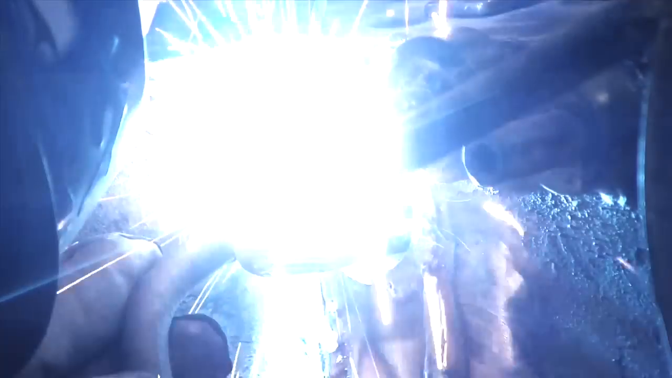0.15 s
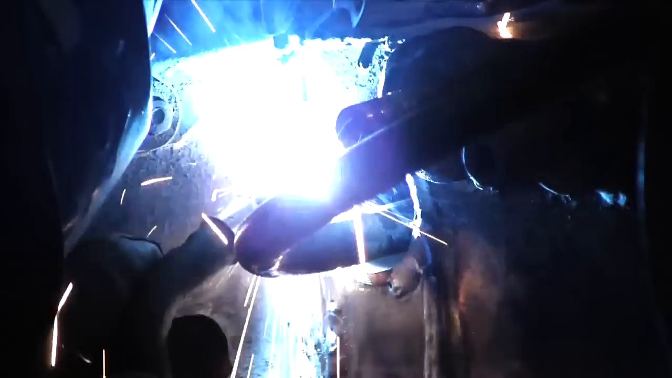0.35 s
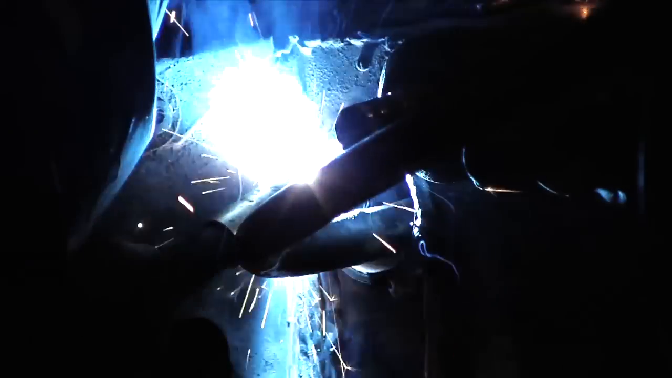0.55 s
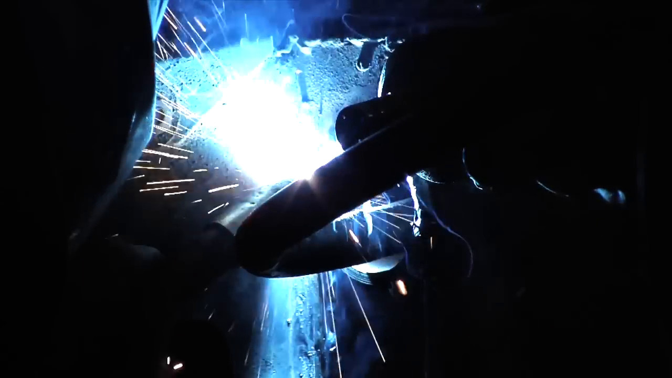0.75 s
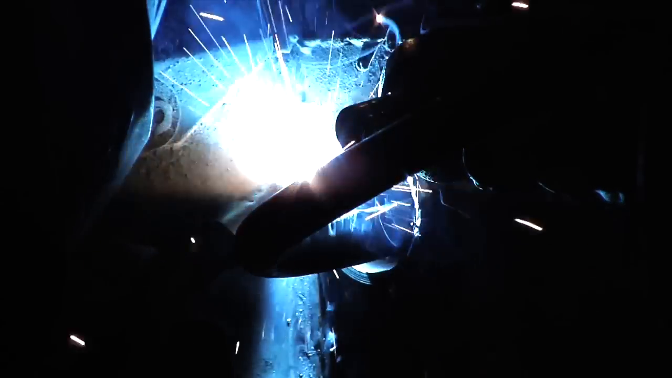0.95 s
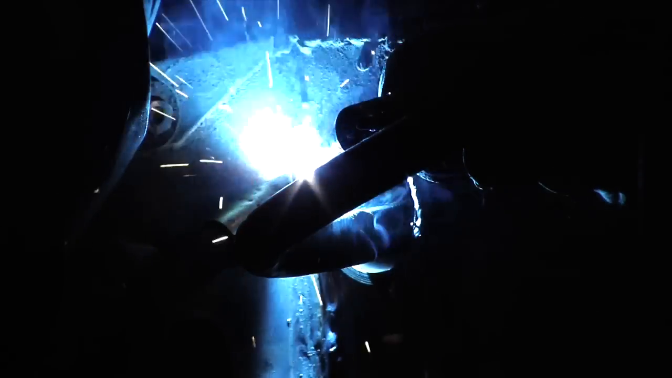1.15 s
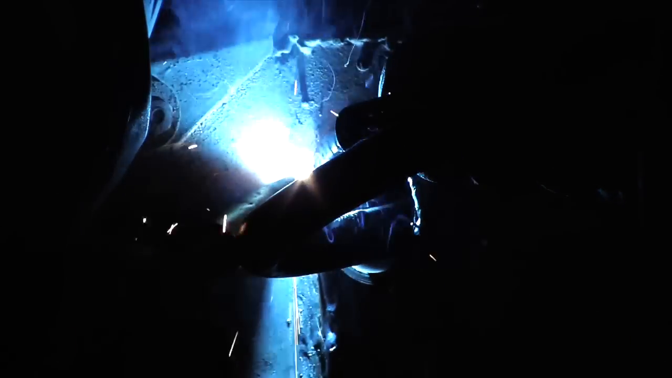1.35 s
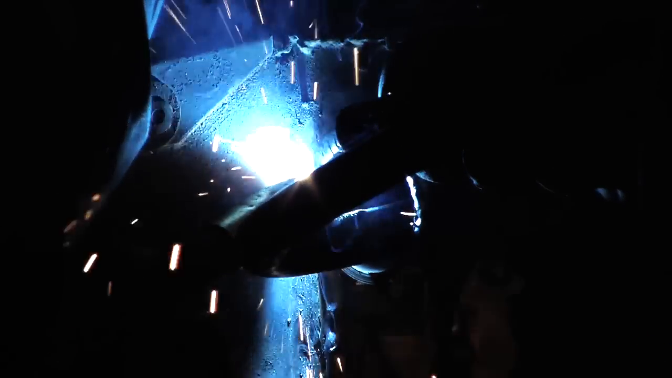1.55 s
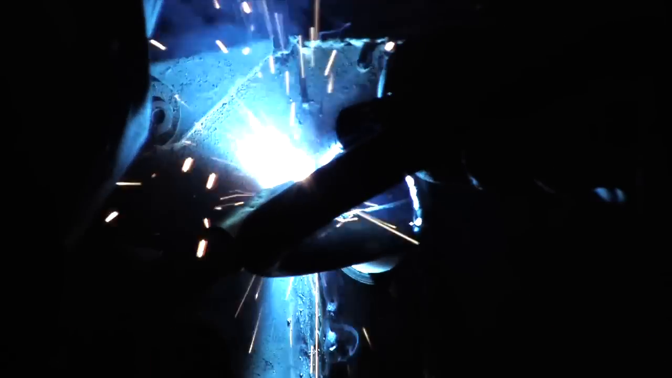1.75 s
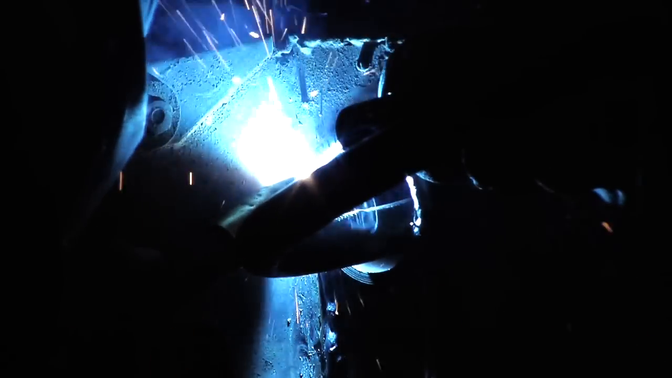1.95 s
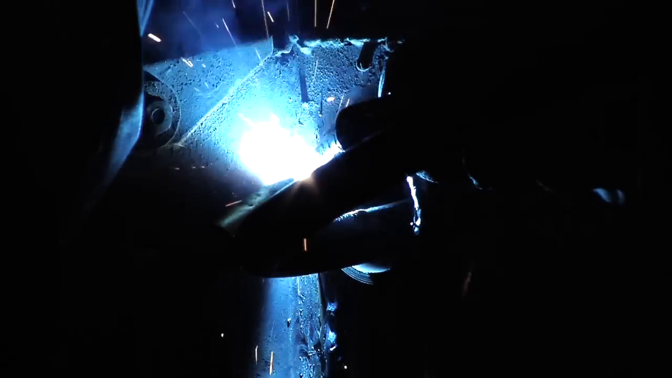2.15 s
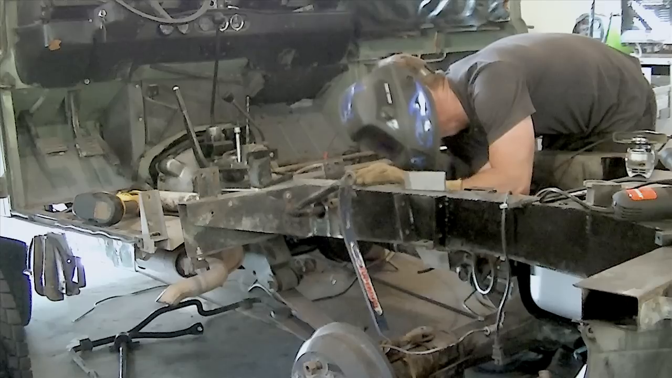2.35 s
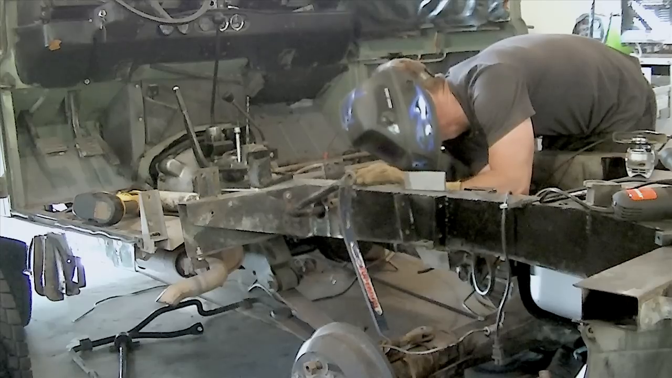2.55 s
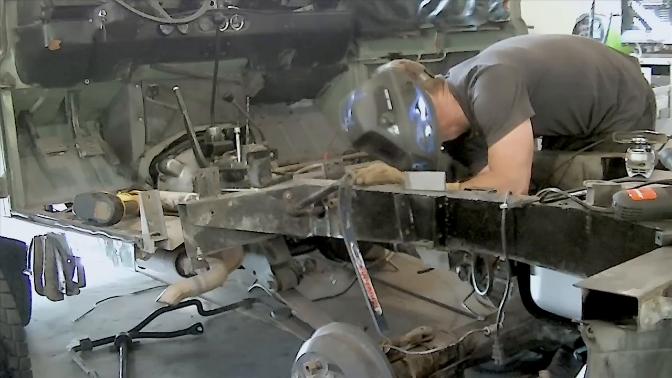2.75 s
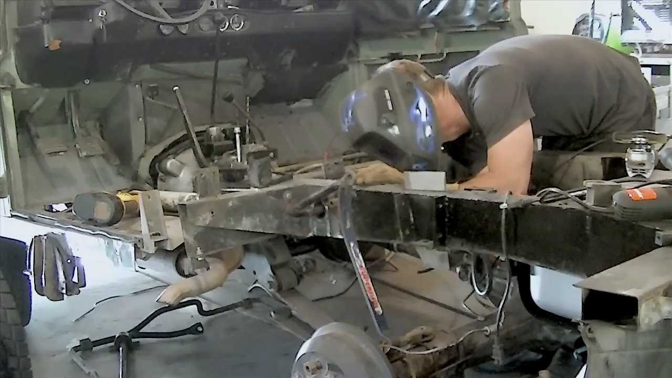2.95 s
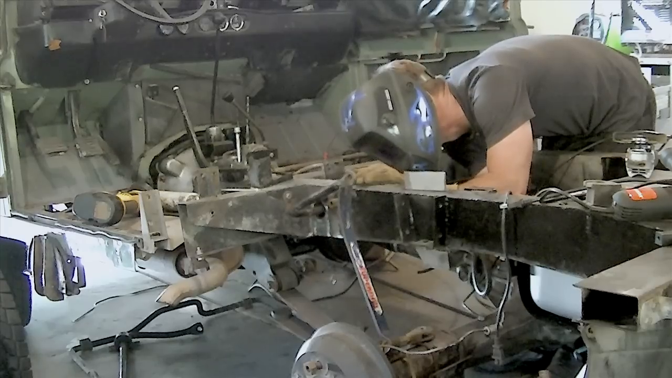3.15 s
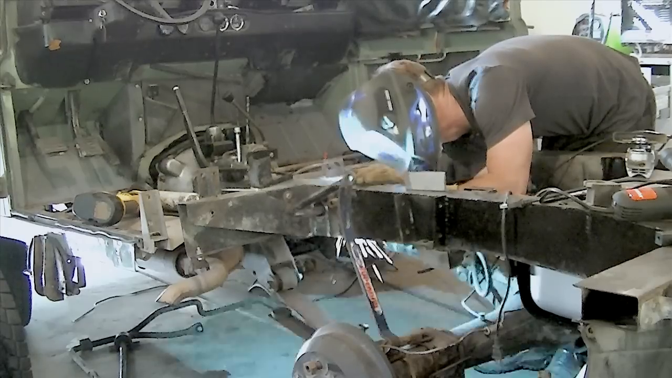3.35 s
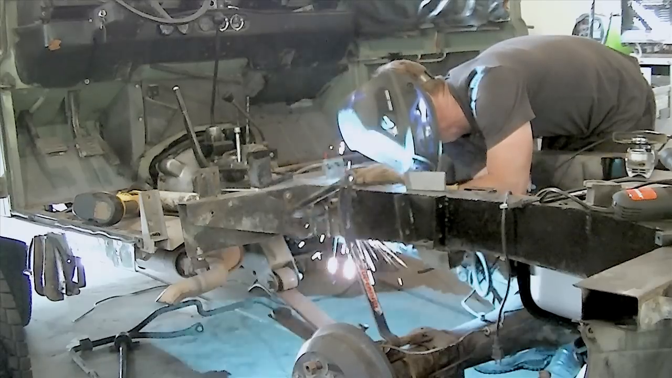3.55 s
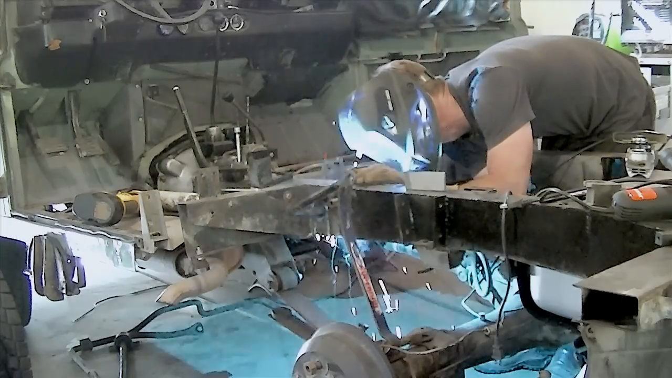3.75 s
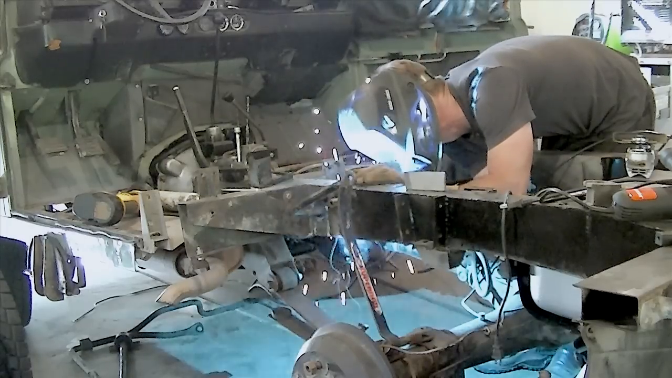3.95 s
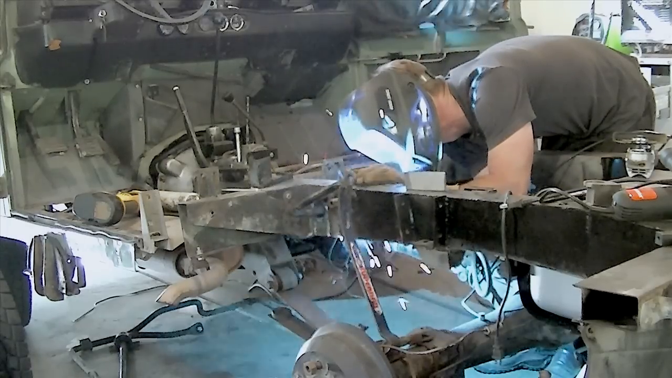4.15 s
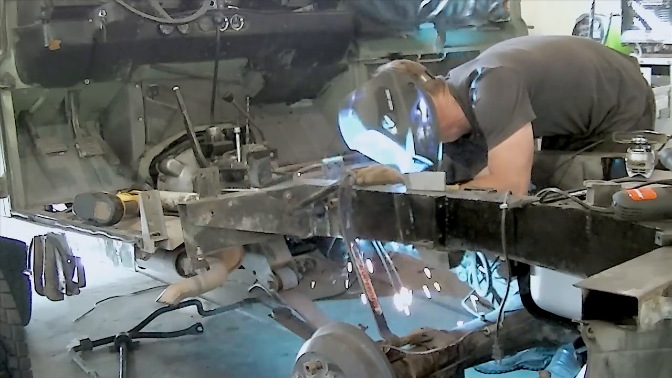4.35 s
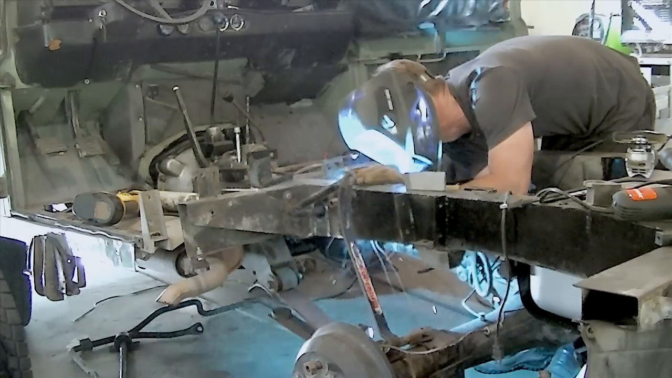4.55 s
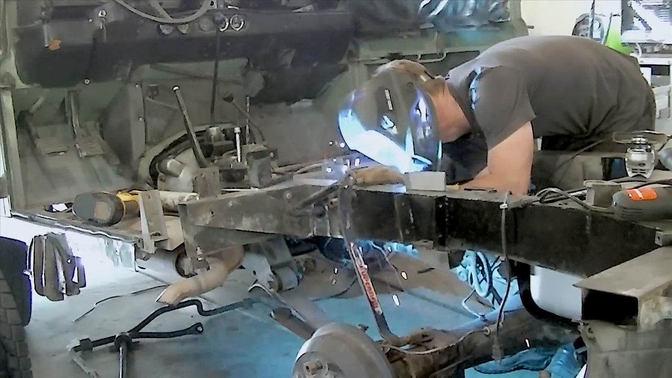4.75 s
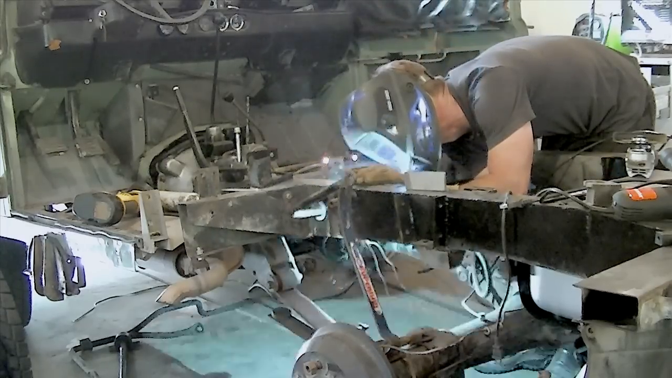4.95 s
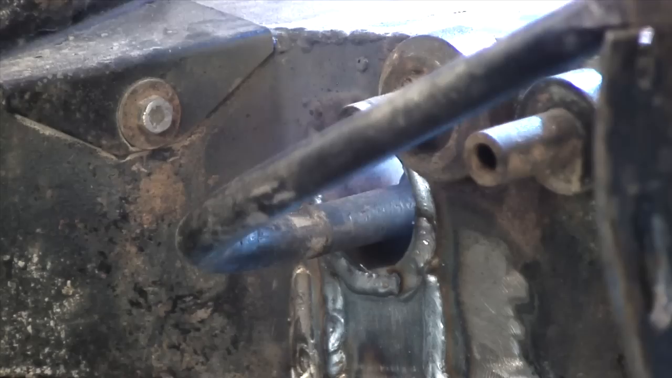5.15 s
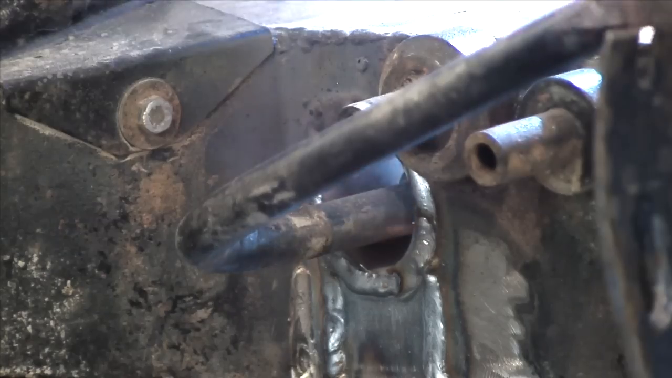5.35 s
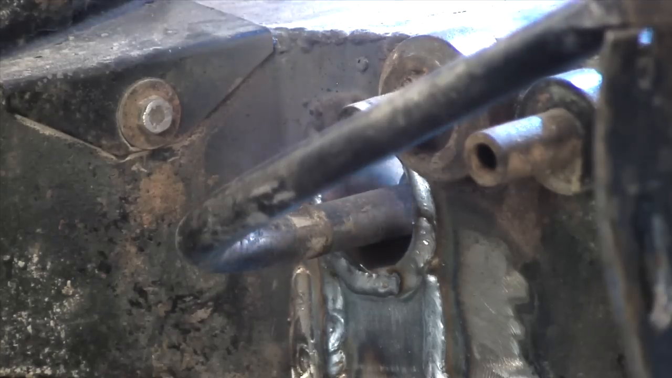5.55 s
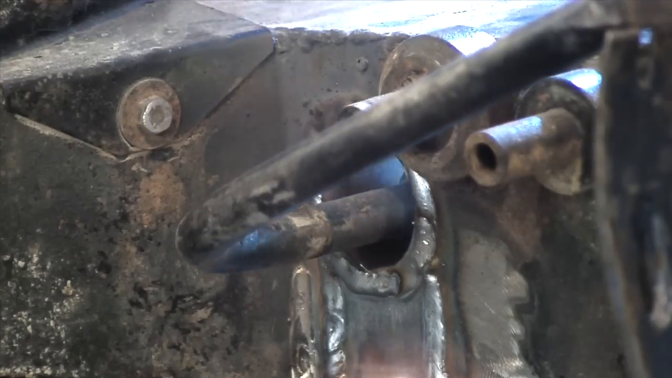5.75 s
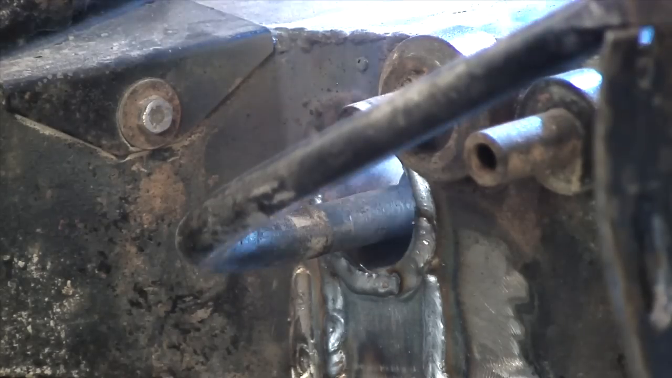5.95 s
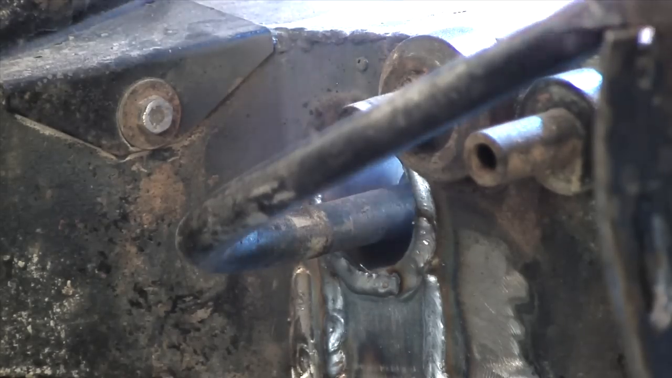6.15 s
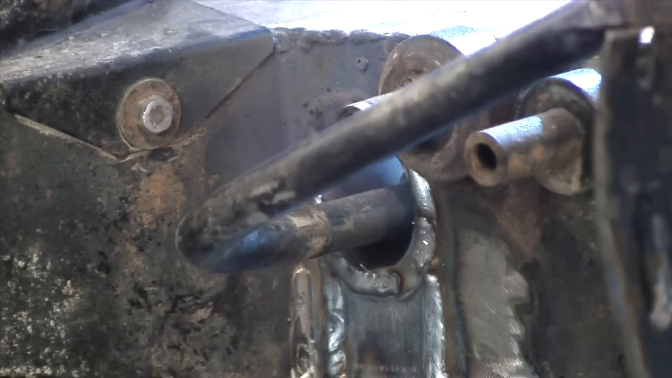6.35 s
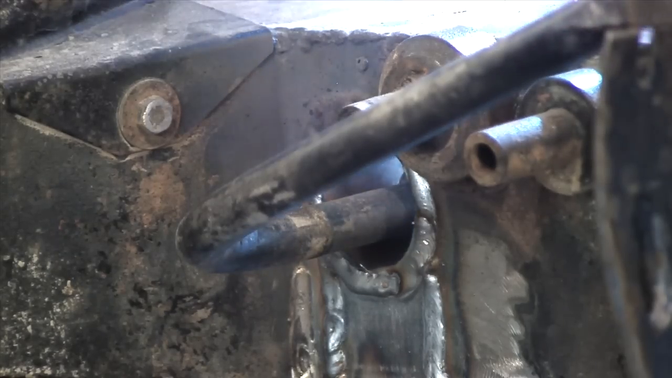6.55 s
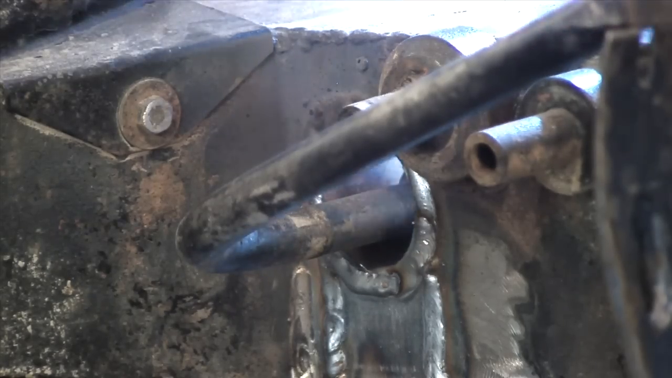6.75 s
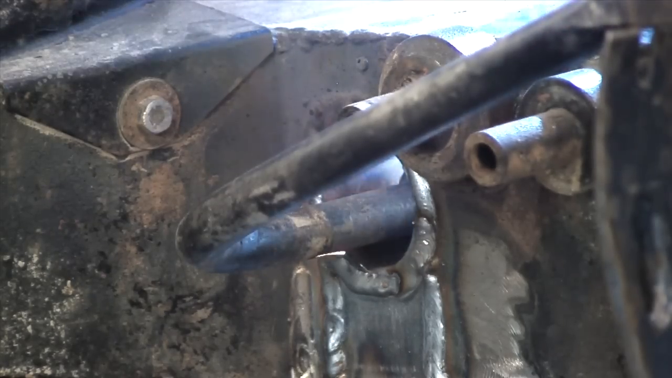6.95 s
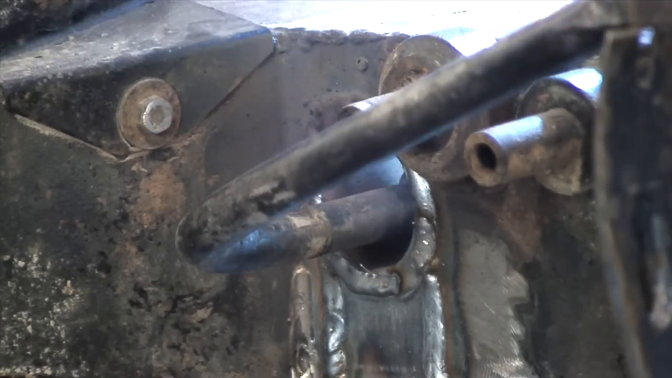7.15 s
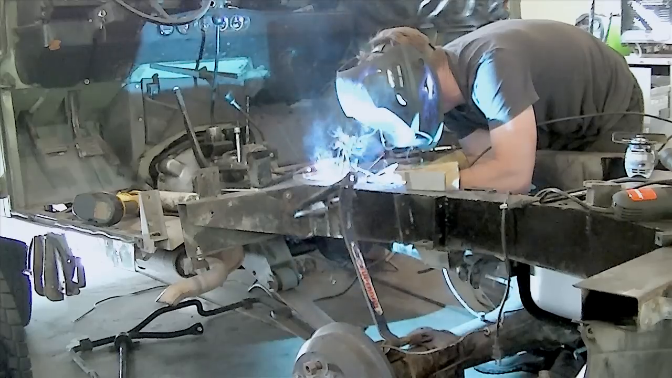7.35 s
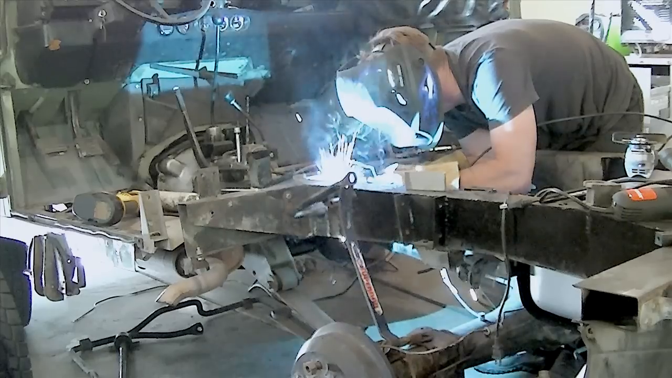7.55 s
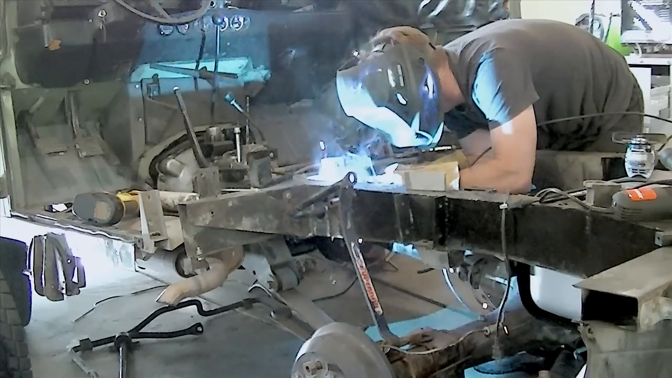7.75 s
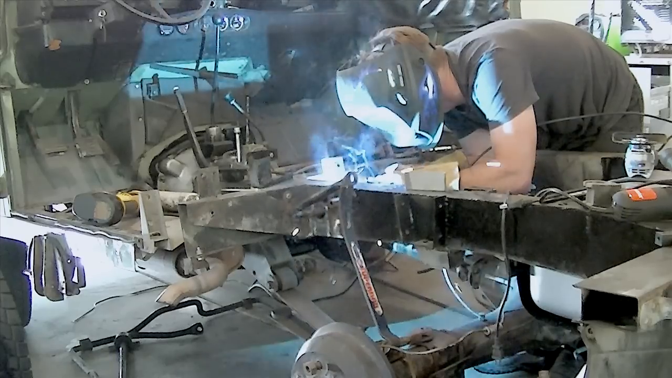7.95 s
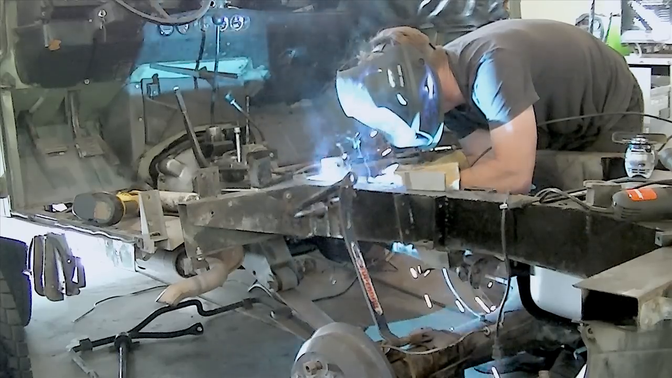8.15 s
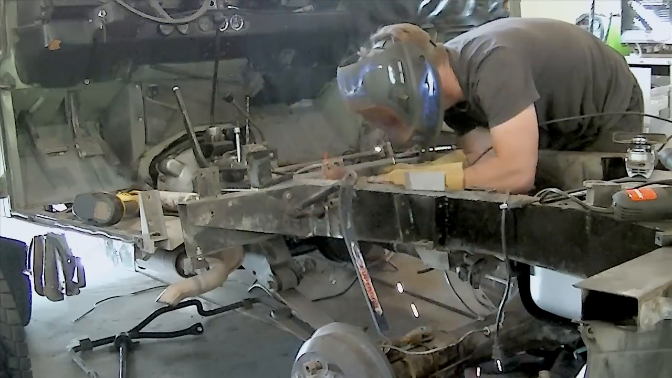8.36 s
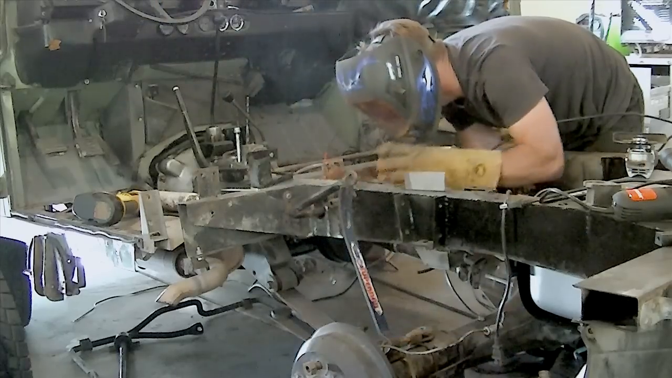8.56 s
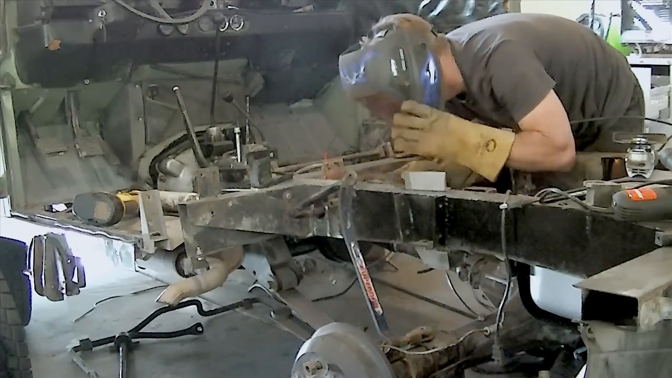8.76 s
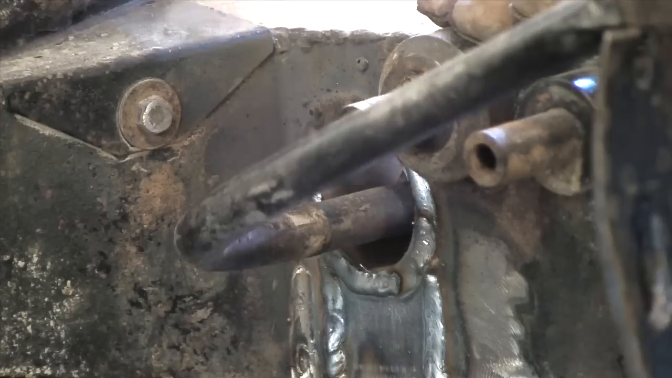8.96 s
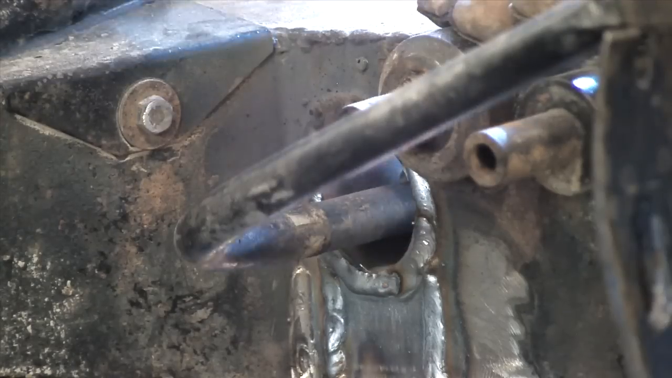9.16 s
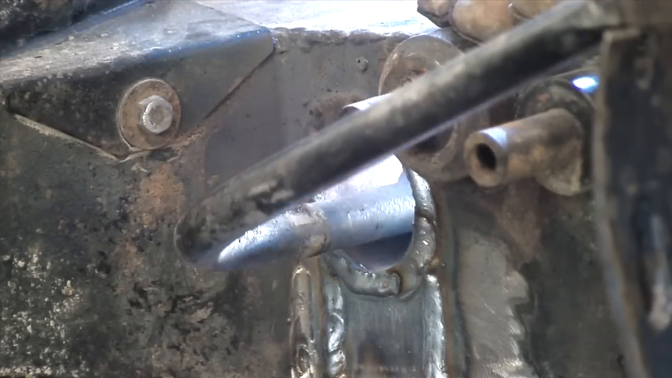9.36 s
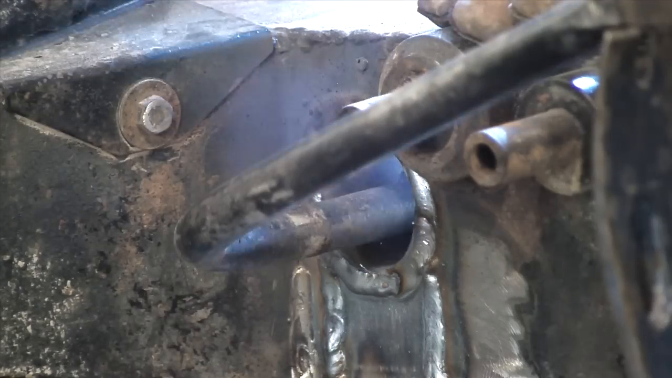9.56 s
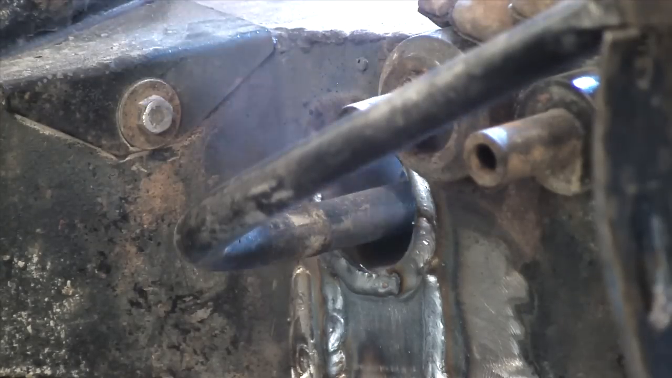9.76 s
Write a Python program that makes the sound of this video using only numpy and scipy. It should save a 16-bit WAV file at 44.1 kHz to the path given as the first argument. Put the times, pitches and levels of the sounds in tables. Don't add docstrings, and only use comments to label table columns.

```python
import sys
import numpy as np
from scipy import signal
from scipy.fft import rfft, irfft, next_fast_len
from scipy.io import wavfile
from scipy.ndimage import uniform_filter1d

SR = 44100
rng = np.random.default_rng(int(sys.argv[2]) if len(sys.argv) > 2 else 0)


def invert_db(x):
    u = np.asarray(x, float) / 20
    return 10 ** u


def master_out(mix):
    frames = np.transpose(np.atleast_2d(mix))
    ceiling = np.clip(frames, -1, 1)
    pcm = np.round(ceiling * 32767).astype(np.int16)
    wavfile.write(sys.argv[1], SR, pcm)


N = 432621
TOP_HZ = 15230


def on_log_axis(table, hz):
    table_hz, value = np.transpose(table)
    return np.interp(np.log(hz + 1), np.log(table_hz), value)


def shaped(x, gain):
    size = next_fast_len(len(x))
    spectrum = rfft(x, size) * gain(np.fft.rfftfreq(size, 1 / SR))
    return irfft(spectrum, size)[:len(x)]


def level(x, db):
    return x * invert_db(db) / np.sqrt(np.mean(x ** 2))


# (time [s], energy [dB])
BURSTS_1 = [(.1113, 5.5), (.1263, 9.5), (.1492, -14), (.1763, 5), (.1815, 5), (.1886, 9), (.2028, 7.5),
            (.222, 5.5), (.2401, 7), (.2466, 2), (.2698, 9), (.2905, 5), (.2982, 7), (.3049, 9),
            (.3212, 12), (.346, 11.5), (.3534, 7), (.3695, 7.5), (.3866, 5), (.395, 7), (.4232, 8.5),
            (.4385, 7), (.4696, -6), (.4944, 10), (.5213, 11), (.5435, 4), (.5502, 9), (.5645, -0.5),
            (.5809, 6), (.599, 7), (.635, 2.5), (.678, -2), (.6985, 1.5), (.7201, 0), (.7384, -3),
            (.7762, -2), (.8438, 2), (.8645, -9), (.8885, 6.5), (.9112, 1)]
BURSTS_1_RECOVERED = [(0.9317, 5.5), (0.9521, 3), (0.971, -0.5), (0.994, 2), (1.0154, -1), (1.0357, 3.5),
                      (1.0553, 2), (1.0756, 5.5), (1.093, -5), (1.1128, 6), (1.1302, 8), (1.138, 6),
                      (1.1457, 2), (1.1635, 8.5), (1.1885, 8), (1.1963, 7), (1.205, 6), (1.2136, 9),
                      (1.2349, 5.5), (1.256, 9), (1.2862, 2), (1.3089, 4), (1.3259, 2), (1.3363, 4),
                      (1.3596, 5.5), (1.369, 4), (1.3879, 6), (1.4047, 4), (1.4227, 8.5), (1.4534, 5.5),
                      (1.487, 6), (1.5292, -1), (1.547, 0), (1.5973, 8), (1.6111, 3), (1.6194, 2),
                      (1.635, 2)]
BURSTS_1_STEADY = [(1.6532, 1), (1.6658, 5), (1.701, 2), (1.7215, 5.5), (1.7276, 4), (1.7536, 5.5),
                   (1.7645, 3), (1.7863, 1), (1.8085, 3.5), (1.8191, 2.5), (1.8313, 6.5), (1.8705, 7),
                   (1.8875, 4), (1.9114, 1), (1.9202, 4), (1.93, 0), (1.9662, -5), (1.9736, 3), (1.9907, 1),
                   (2.0076, 7), (2.023, -2), (2.0336, 5), (2.0455, 7), (2.0546, 6), (2.0617, 4),
                   (2.0879, 9), (2.0954, 4), (2.1177, 0), (2.129, 6), (2.1513, 3), (2.1641, 8), (2.1875, 2),
                   (2.1993, 5), (2.2198, 7.5), (2.2776, 6), (2.2892, 2), (2.3204, 4)]
BURSTS_2 = [(3.5613, -4), (3.5857, -1), (3.6033, -3), (3.6265, 2.5), (3.6504, 8), (3.6802, 5.5),
            (3.7098, -3), (3.7204, 4), (3.7429, 0), (3.7629, 0.5), (3.841, -2), (3.8551, 4), (3.87, -4),
            (3.8836, -2), (3.8981, -1), (3.9101, 2), (3.927, 1.5), (3.9642, 0), (3.9812, 2), (4.007, 0.5),
            (4.0272, 0), (4.055, 1), (4.0652, 1), (4.0771, 0), (4.0949, 1), (4.1115, -1), (4.1366, 3),
            (4.1534, -0.5), (4.171, 0), (4.2371, -1.5), (4.2474, -6), (4.2576, -3), (4.272, -5),
            (4.3091, -3), (4.3663, -5.5), (4.3929, -6), (4.4611, -8), (4.4756, -5), (4.5086, -5.5),
            (4.5218, -7), (4.5733, -2.5), (4.5886, 2.5), (4.6051, -4), (4.6541, -6), (4.6667, -15),
            (4.6782, -9), (4.6874, -2), (4.6981, -7), (4.714, -2.5), (4.7476, -3), (4.7775, -6),
            (4.7941, -5), (4.866, -4.5), (4.9266, -8.5)]
BURSTS_2_STRIKES = [
    (3.4311, -7),
    (3.4428, 2),
    (4.7317, -3.5),
    (5.0428, 9.5),
    (5.1331, -7),
]
BURSTS_3 = [(5.2273, -1), (5.2754, 4.5), (5.3009, 0), (5.3279, 1), (5.3783, 1), (5.4051, -3), (5.4234, 0),
            (5.4503, 2), (5.4947, 3), (5.5169, -2), (5.574, 0.5), (5.5985, -4), (5.6468, -1.5),
            (5.6577, -3.5), (5.7123, -4.5), (5.7843, -0.5), (5.8295, -4.5), (5.8439, -7), (5.9348, -2.5),
            (5.9856, -5), (5.999, -5), (6.0422, -7), (6.0666, 1), (6.1122, -1), (6.1511, -0.5),
            (6.1901, -5), (6.2152, 2), (6.2574, 6), (6.2927, 3), (6.3288, 2.5), (6.3653, 1), (6.3907, -2),
            (6.4187, -4), (6.4462, -5), (6.4618, 2.5), (6.4923, 4.5), (6.573, -4), (6.5872, -5),
            (6.636, -3), (6.6662, -1), (6.693, -0.5), (6.7505, 3), (6.8144, -4), (6.8416, 1),
            (6.8647, -3.5), (6.8862, -7), (6.9165, -3), (6.9544, -1), (7.0043, 2.5), (7.0372, 4.5),
            (7.0571, 0), (7.0969, -1), (7.1373, -1), (7.15, -2), (7.1795, 0), (7.2083, 1.5), (7.2638, -1),
            (7.2831, 2)]
BURSTS_4 = [(7.3401, -4), (7.3488, -7), (7.3788, -2), (7.4034, -6), (7.4295, 1.5), (7.4568, -0.5),
            (7.4862, 3.5), (7.5151, 1), (7.5446, 2), (7.573, 3), (7.6055, 2.5), (7.6275, 1), (7.6809, 0),
            (7.7404, -7), (7.7666, -7), (7.8115, -2.5), (7.8547, -6.5), (7.877, -4), (7.9236, 0.5),
            (7.9331, -2), (7.9615, -4.5), (8.0004, 0.5), (8.0527, 1.5), (8.0965, 0.5), (8.2051, -1.5),
            (8.2603, -3), (8.2982, 0), (8.3733, -13)]
BURSTS_5 = [(9.055, 1.5), (9.0864, -8), (9.1878, -12), (9.203, 2.5), (9.2545, 0.5), (9.2798, 1),
            (9.2956, 6), (9.3038, 10.5), (9.3561, 4.5), (9.3897, 3.5), (9.433, -4), (9.4452, 0.5),
            (9.5144, -4), (9.5482, 5.5), (9.6133, 2.5), (9.622, -1), (9.659, 2), (9.6815, 4.5),
            (9.717, 7.5), (9.783, 3)]
# (time [s], wire drops [1/s], small pop [dB], sizzle [dB], arc treble [dB])
BEAD_1 = [(.03, 40, -30, -53, -3), (.06, 40, -30, -45.5, -1.5), (0.109, 40, -6, -52.5, 1),
          (.16, 75, -7, -28, -2), (.55, 51, -2, -38, 3), (.66, 55, 2.5, -29, 4.5), (.75, 52, -7, -23, -1.5),
          (.85, 47, -9.5, -20, -22)]
BEAD_1_RECOVERED = [(.95, 48.4, -6, -27, -8), (1.08, 49.6, -4, -24.5, -11.5), (1.16, 91, 3, -18, -3.5),
                    (1.42, 90.5, -1.5, -32, -1), (1.56, 70.5, -9, -26, 0), (1.7, 95.2, -3.5, -32, -0.5),
                    (1.96, 90.3, -1.5, -26.5, -4), (2.33, 88.5, -4, -18, -2.5)]
BEAD_2 = [(3.41, 20, -30, -47, 12), (3.45, 23, -38, -38, -5.5), (3.56, 39, -15, -43, 6.5),
          (3.66, 39, -8, -34, 1.5), (3.8, 60, -6, -39, -0.5), (3.999, 74, -3, -33, -4),
          (4.27, 64, -9, -29, -2)]
BEAD_2_STUTTER = [(4.36, 40, -17, -37, 1), (4.39, 56, -13, -31, 4), (4.54, 56.3, -20, -34.5, 3),
                  (4.62, 60.2, -10, -26.5, -2.5), (4.66, 30, -16, -42, -1), (4.7, 79, -10, -31, 7.5),
                  (4.78, 79, -12, -31.5, 2.5), (4.89, 80, -7, -32.5, 4.5)]
BEAD_2_RESTRUCK = [(4.92, 48, -40, -41, 1.8), (5.0, 22, -44, -49, 2.1), (5.06, 29.5, -30, -40, 2.9),
                   (5.1, 36, -26, -34.5, 5), (5.139, 109.3, -7.5, -39, 1.5), (5.24, 115, -11, -43, 2)]
BEAD_3 = [(5.22, 45.1, -4, -25, -1.5), (5.45, 50.2, -10, -26, -0.5), (5.7, 54.9, -18, -31, 4.5),
          (5.901, 30, -15, -48, 4), (6.1, 60, -8, -27, -4), (6.3, 39.5, -7, -35, 2),
          (6.55, 49.7, -6.5, -32, 4.5), (6.8, 60.3, -8.5, -32, 0.5), (7.31, 54.8, -6, -26, 2)]
BEAD_4 = [(7.3, 70, -12, -38, 2), (7.55, 75, -3, -28.5, -7.5), (7.8, 60.2, -14, -44, 2),
          (8.1, 75.6, -9.5, -42, 3), (8.25, 74.7, -6.5, -35, -3.5), (8.32, 60, -13, -37, -2.5),
          (8.38, 40, -26, -54, -6)]
BEAD_5 = [(8.97, 40, -34, -45, -4), (9.03, 40, -30, -43, 4), (9.05, 30.3, -16, -43, 5.5),
          (9.2, 49.8, -17, -39, 3.5), (9.32, 40, -9, -27.5, 0.5), (9.5, 76.8, -7, -24.5, 4.5),
          (9.81, 49.8, -13, -27, 0)]
RUNS = [(BURSTS_1 + BURSTS_1_RECOVERED + BURSTS_1_STEADY, BEAD_1 + BEAD_1_RECOVERED),
        (sorted(BURSTS_2 + BURSTS_2_STRIKES), BEAD_2 + BEAD_2_STUTTER + BEAD_2_RESTRUCK),
        (BURSTS_3, BEAD_3), (BURSTS_4, BEAD_4), (BURSTS_5, BEAD_5)]
DROP_JITTER_CYCLES, POP_SPREAD_DB = .15, 2.5


def pops(bursts, curve, stop_s):
    s, rate_hz, small_db = np.transpose(curve)[:3]
    clock = np.linspace(s[0], s[-1], num=2000)
    cycles = np.cumsum(np.interp(clock, s, np.maximum(rate_hz, 1))) * (clock[1] - clock[0])
    burst_s = [when for when, _ in bursts]
    marks = np.interp(burst_s + [min(s[-1], stop_s)], clock, cycles)
    chance = np.clip(rng.standard_normal(size=(len(bursts), 64, 2)), -2, 2)
    rows = list(bursts)
    for begin, end, luck in zip(marks, marks[1:], chance):
        drops = np.arange(1, round(end - begin))
        spacing = (end - begin) / (len(drops) + 1)
        uneven = drops + DROP_JITTER_CYCLES * luck[drops, 0]
        when = np.interp(begin + uneven * spacing, cycles, clock)
        rows += zip(when, np.interp(when, s, small_db) + POP_SPREAD_DB * luck[drops, 1])
    return rows


# (time [s], delay [ms], level against the first [dB])
TWINS = [
    (5.0429, .82, -7),
    (9.0549, .227, -10),
    (9.0549, .455, -1.5),
]
SIZZLE_TRIM_DB, SPATTER_RATE_HZ = -6.5, 1500
SPATTER_SPREAD_DB, LARGEST_DROP = 6.5, 2.5


def arc(t, start_s, before_db, bursts, curve):
    s, sizzle_db, treble_db = np.transpose(curve)[[0, 3, 4]]
    hit = rng.random(len(t)) < SPATTER_RATE_HZ / SR
    drop_size = np.minimum(rng.exponential(size=len(t)), LARGEST_DROP)
    spatter = level(hit * invert_db(SPATTER_SPREAD_DB * drop_size), 0)
    burn_db = np.interp(t, s, sizzle_db, left=-120, right=-120) + SIZZLE_TRIM_DB
    drive = spatter * invert_db(np.where(t < start_s, before_db, burn_db))
    for when, db in pops(bursts, curve, t[-1]):
        at = round((when - t[0]) * SR)
        drive[at] += invert_db(db)
        for strike_s, ms, second_db in TWINS:
            if abs(when - strike_s) < .003:
                drive[at + round(ms * SR / 1000)] += invert_db(db + second_db)
    treble = shaped(drive, lambda f: 1 / (1 + (4000 / (f + 1)) ** 2))
    return drive + treble * (invert_db(np.interp(t, s, treble_db)) - 1)


# (time [s], level [dB])
CLUNKS = [
    (.045, 1.5),
    (3.418, 4),
    (8.948, -0.5),
]


def trigger(t):
    rattle = 0
    for when, db in CLUNKS:
        if when < t[-1] - .05:
            since = np.maximum(t - when, 0)
            rattle = rattle + invert_db(db - 25.5) * np.exp(-since / 0.029) * (1 - np.exp(-since / .01))

    def case_and_gas(f):
        dull = 1 / (1 + (f / 2700) ** 6)
        case = 2.7 / (1 + ((f - 460) / 60) ** 4)
        gas = 0.2 / (1 + ((f - 8000) / 2200) ** 4)
        return dull + case + gas

    return shaped(rattle * rng.standard_normal(len(t)), case_and_gas)


# time [s], half length [s], level [dB]
SPARK = (2.3408, .002, -63)


def spark():
    when, half_s, db = SPARK
    fizz = shaped(rng.standard_normal(N), lambda f: 1 / (1 + (4800 / (f + 1)) ** 8) / (1 + (f / 8000) ** 2))
    return invert_db(db) * fizz * np.exp(-((np.arange(N) / SR - when) / half_s) ** 4)


def ring(hz, width_hz, db, order=1):
    pole = np.exp(-np.pi * width_hz / SR)
    struck = signal.unit_impulse(SR)
    for _ in range(order):
        struck = signal.lfilter([1, 0, -1], [1, -2 * pole * np.cos(2 * np.pi * hz / SR), pole ** 2], struck)
    return struck * invert_db(db) / np.sqrt(np.sum(struck ** 2))


def recolour(answer, table, size=2048):
    hz = np.fft.rfftfreq(size, 1 / SR)
    power = uniform_filter1d(abs(rfft(answer)) ** 2, size=100)
    gain = invert_db(on_log_axis(table, hz)) / np.sqrt(power[hz.astype(int)])
    cep = irfft(np.log(gain), size)
    cep[1:size // 2] *= 2
    cep[size // 2 + 1:] = 0
    return signal.fftconvolve(answer, irfft(np.exp(rfft(cep)), size))[:SR]


# (delay [ms], level [dB])
PLACES = [
    ((2000, 14200, 2.1), (9.4, 1.7, 2.5), 120, [(.6, 2.5), (1.2, -23.5), (4.4, -9), (5.7, -21.5), (7.8, -1.5), (13, -21), (22.2, -6)]),
    ((1920, 680, 6.1), (19.2, 2.8, 1.5), 5100, [(.15, 6), (.55, 0), (2.5, -16), (4.2, 1), (13.9, -11), (15.5, 8), (16, 4), (16.5, 7), (17.1, 4), (20.7, -1)]),
    ((1850, 510, -0.77), (17, 3.5, 2.5), 13500, [(.15, 5), (.55, 12), (.95, 6), (12.9, 13), (13.8, 13), (14.1, 14), (15.4, 15), (15.9, 11), (16.4, 7), (17.0, 12)]),
]
# (frequency [Hz], level [dB])
COLOURS = [
    [(190, -57.5), (330, -28.5), (559, -18.5), (666, -19.5), (722, -12.5), (782, -11), (1300, -2.5),
     (1580, -4.5), (1940, -9.5), (2990, -5.5), (3990, -7.5), (7200, -5), (8180, -12), (10200, -10.5),
     (13500, -20.5), (15100, -24)],
    [(190, -55), (330, -23.5), (635, -13.5), (757, -12.5), (847, -5.5), (1480, -0.5), (1790, -4.5),
     (1940, -1), (2350, -4), (2990, -3), (5230, -5.5), (5940, -2.5), (7920, -6.5), (9590, -5),
     (13300, -15.5), (14900, -19)],
    [(190, -62), (357, -19.5), (600, -16.5), (917, -4.5), (1350, -1), (1850, -2), (2100, -4.5), (3190, -4),
     (4900, -4), (5480, -5.5), (7080, -3.5), (8580, -7.5), (9750, -4.5), (12000, -10.5), (13900, -19.5),
     (14600, -16), (15300, -18)],
]
# (frequency [Hz], width [Hz], lift [dB])
PANEL_MODES = [
    [(1271, 23, 2.5), (1360, 29, 4.5), (1425, 25, 3), (1602, 24, 6.5), (2190, 35, 6), (2531, 15, -1),
     (2665, 30, 2.5), (3055, 25, 5), (3630, 15, 7.5), (5780, 26, 9.5), (6030, 22, 2), (6670, 22, 2.5),
     (6680, 20, 3), (6992, 15, -3)],
    [(1350, 37, 1.5), (1507, 22, 4), (1670, 23, 5.5), (1994, 23, 4.5), (3550, 18, 0), (4900, 20, 5),
     (4955, 20, 5), (9746, 20, 6)],
    [(1390, 30, 1), (1501, 20, 4), (1557, 18, 5), (1620, 27, 1.5), (1746, 22, 5.5), (2826, 31, 5.5),
     (3120, 25, 8), (3342, 17, 7), (5000, 33, 3.5), (6100, 40, 7), (7200, 29, 5)],
]
# (frequency [Hz], T60 [s])
SHOP_T60 = [(500, 0.69), (1500, 0.91), (4000, 0.7), (8000, 0.52), (13000, 0.35)]
# frequency [Hz], width [Hz], level [dB]
FRAME_RING = (1330, 590, -4)


def shop(direct, diffuse, mirror_hz, echoes, colour, modes):
    t = np.arange(SR) / SR
    diffuse_db, build_ms, late_ms = diffuse
    early = SR // 25
    answer = ring(*direct, order=2) + ring(*FRAME_RING)
    answer = signal.lfilter(*signal.butter(3, 8000, fs=SR), answer)
    mirrored = np.zeros(SR)
    for ms, db in echoes:
        mirrored[int(ms * SR / 1000)] = invert_db(db)
    answer += signal.lfilter(*signal.butter(1, mirror_hz, "high", fs=SR), mirrored)
    wash, noise = 0, rng.standard_normal(SR)
    for centre_hz in 125 * 2 ** np.arange(0, 7.6, .5):
        band = shaped(noise, lambda f: np.clip(1 - 2 * abs(np.log2((f + 1) / centre_hz)), 0, 1))
        t60 = on_log_axis(SHOP_T60, centre_hz)
        band_build_ms = build_ms * min(centre_hz / 4000, 1) ** 2
        rise = 1 - np.exp(-np.maximum(t * 1000 - late_ms, 0) / band_build_ms)
        wash = wash + band * rise * invert_db(-60 * t / t60) / np.sqrt(t60)
    answer += invert_db(diffuse_db) * wash / np.sqrt(np.sum(wash[:early] ** 2))
    answer = recolour(answer, colour)
    for hz, width_hz, db in modes:
        mode = signal.lfilter(*signal.iirpeak(hz, hz / width_hz, fs=SR), answer)
        answer = answer + (invert_db(db) - 1) * mode
    return answer / np.sqrt(np.sum(answer[:early] ** 2))


# (frequency [Hz], density [dB per Hz])
FAN_RUSH = [(40, -48), (90, -49), (150, -28.5), (194, -13.5), (246, -16.5), (280, -16.5), (370, -18),
            (543, -7.5), (900, -2), (1700, -7), (1950, -10.5), (3400, -18), (5000, -26), (9000, -34),
            (12000, -39), (15000, -38)]
# (frequency [Hz], width [Hz], rms level [dB])
FAN_TONES = [(118.3, 4.6, -88.5), (203, 14, -73.5), (280.3, 6.7, -74), (558, 3, -69), (624, 3, -67),
             (647, 1.5, -67.5), (792, 3, -68.5), (911, 2.2, -59.5), (1015, 7.4, -64.5), (1216, 2.5, -61.5),
             (1534, 2.5, -66.5), (1656, 2.8, -65.5), (1780, 3, -75), (7920, 250, -84)]
FAN_DB, FAN_FLUTTER_HZ, FAN_FLUTTER_DB = -48.5, 9, .3


def fan():
    rush = level(shaped(rng.standard_normal(N), lambda f: invert_db(on_log_axis(FAN_RUSH, f))), FAN_DB)
    flutter = level(shaped(rng.standard_normal(N), lambda f: 1 / (1 + (f / FAN_FLUTTER_HZ) ** 2)), 0)
    hum = rush * invert_db(flutter * FAN_FLUTTER_DB)
    for hz, width_hz, db in FAN_TONES:
        wander = np.cumsum(rng.standard_normal(N)) * np.sqrt(2 * np.pi * width_hz / SR)
        hum = hum + level(np.sin(2 * np.pi * hz * np.arange(N) / SR + wander), db)
    return hum


# (start [s], place 0-2, fan trim [dB], arc burning beforehand [dB])
SHOTS = [
    (0, 0, 0.5, -93.5),
    (2.3294, 1, -0.5, -98),
    (5.2329, 2, 0.5, -27),
    (7.3006, 2, 0, -34.5),
    (8.969, 2, 4, -90),
]
LEAD = 2 ** 15
FADE_S = .0005


def scene():
    answers = [shop(*place, colour, modes) for place, colour, modes in zip(PLACES, COLOURS, PANEL_MODES)]
    top = signal.ellip(16, .3, 90, TOP_HZ, fs=SR, output="sos")
    hum, out = signal.sosfilt(top, fan()), np.zeros(N)
    stops = [shot[0] for shot in SHOTS[1:]] + [N / SR]
    for (start, place, fan_db, before_db), stop, run in zip(SHOTS, stops, RUNS):
        first, last = round(start * SR), round(stop * SR)
        t = np.arange(first - LEAD, last) / SR
        drive = arc(t, start, before_db, *run) + trigger(t)
        in_room = signal.fftconvolve(drive, answers[round(place)])[LEAD:len(t)]
        heard = signal.sosfilt(top, in_room)
        since = t[LEAD:] - start
        to_edge = np.minimum(since, stop - start - since)
        fade = np.sin(np.clip(to_edge / FADE_S, 0, 1) * np.pi / 2) ** 2
        out[first:last] = heard * fade + invert_db(fan_db) * hum[first:last]
    return np.array([out, out]) + signal.sosfilt(top, spark())


# (time [s], level [dB])
JOLTS = [
    (.322, -34),
    (.5213, -44),
    (2.3288, -29),
    (5.2323, -42),
    (7.3007, -50),
    (8.969, -52),
    (9.8, -35),
]


def jolts():
    t = np.arange(N) / SR
    return sum(-invert_db(db) * np.exp(-((t - s) / 0.00015) ** 2) for s, db in JOLTS)


def amplifier_hiss():
    hiss = shaped(rng.standard_normal(N), lambda f: (f < TOP_HZ) / (1 + (5000 / (f + 1)) ** 4))
    side = level(hiss, -75.5)
    return np.array([side, -side])


def low_pass(x):
    return signal.sosfilt(signal.butter(12, 16490, fs=SR, output="sos"), x)


def record(dry):
    mix = np.clip(dry + jolts() + amplifier_hiss(), -1, 1)
    return low_pass(mix)


dry = scene()
out = record(dry)
master_out(out)
```